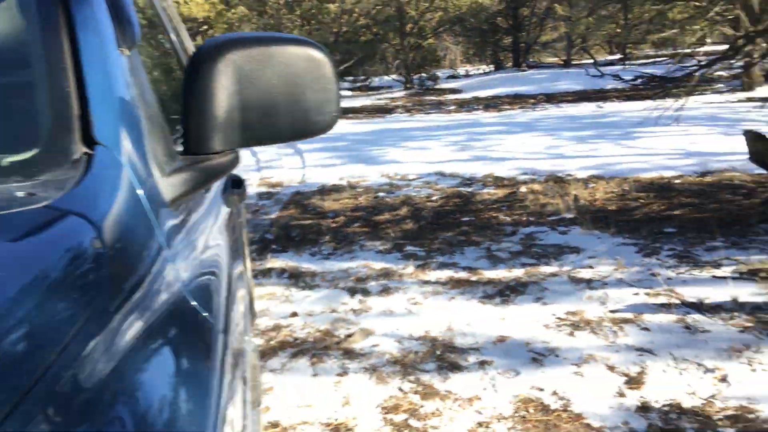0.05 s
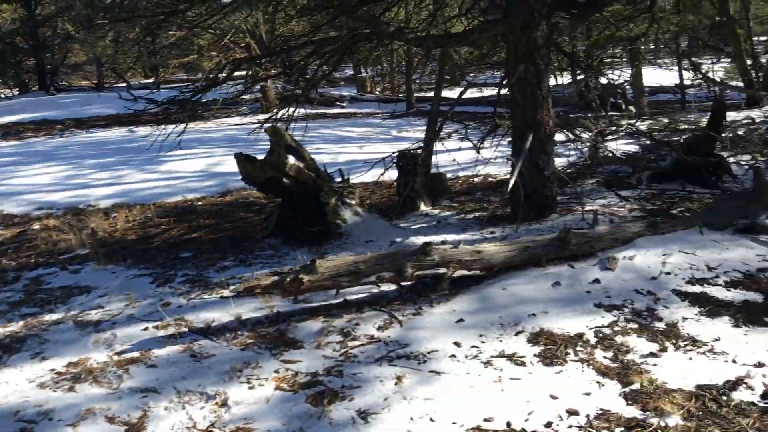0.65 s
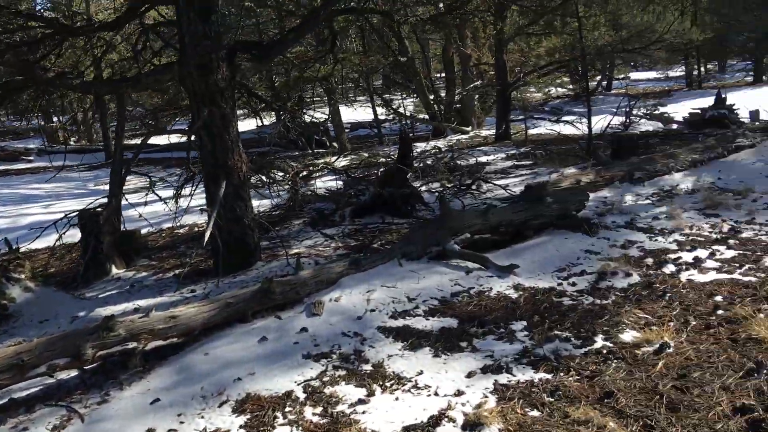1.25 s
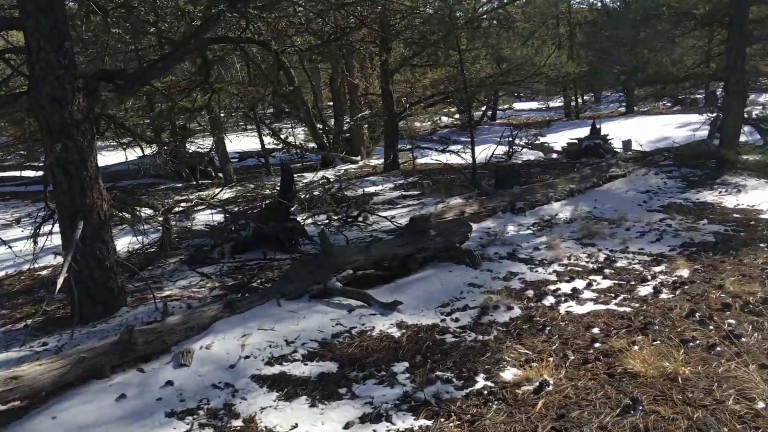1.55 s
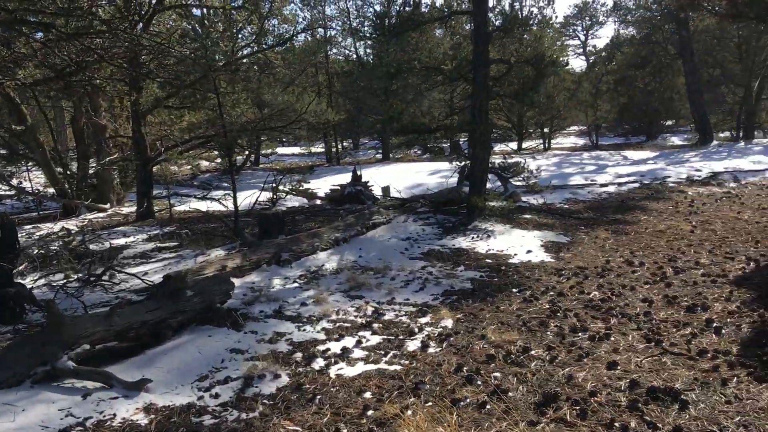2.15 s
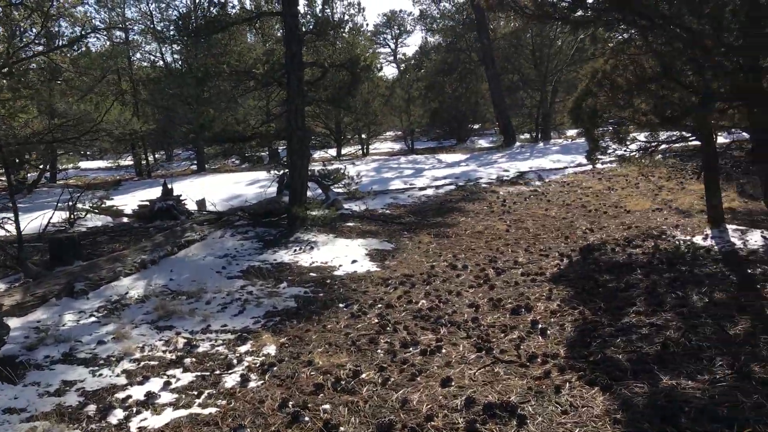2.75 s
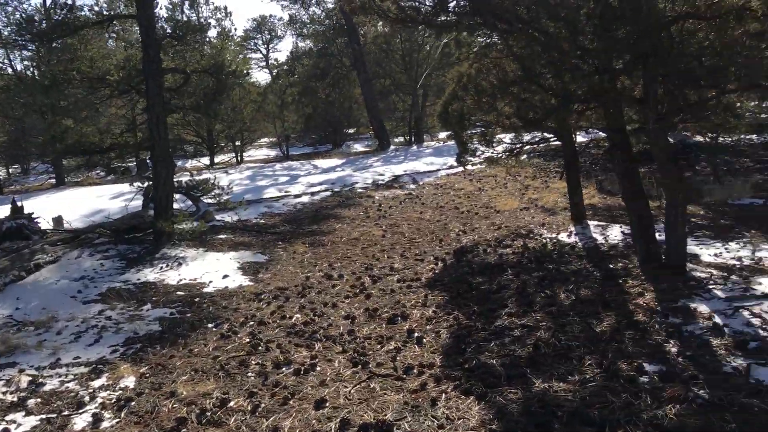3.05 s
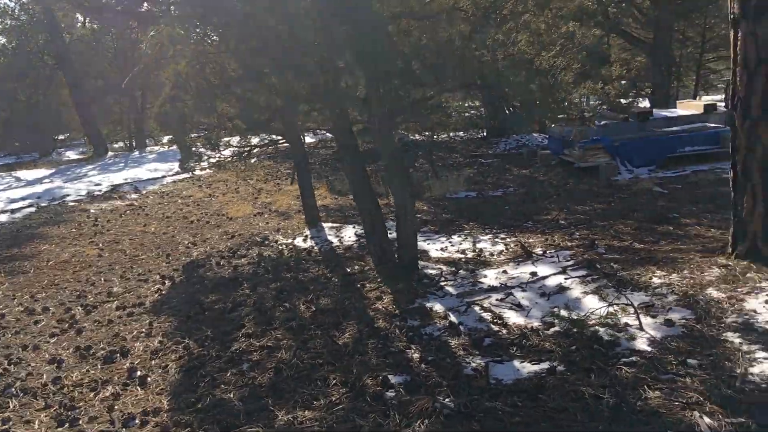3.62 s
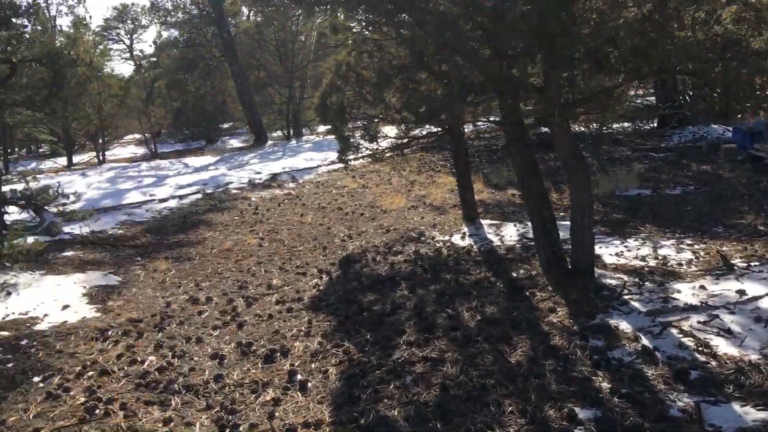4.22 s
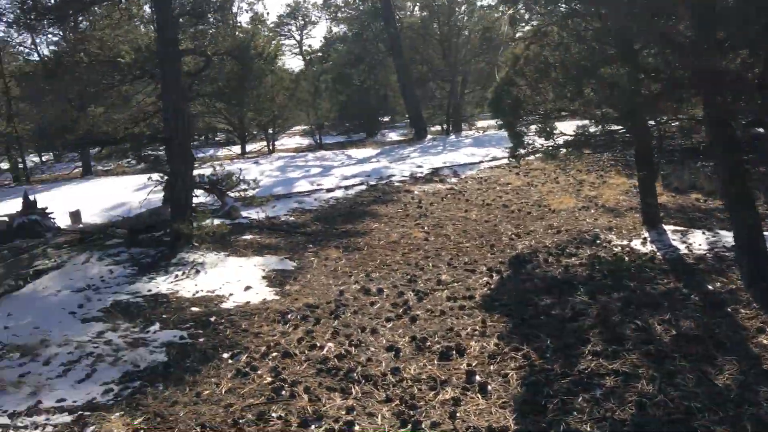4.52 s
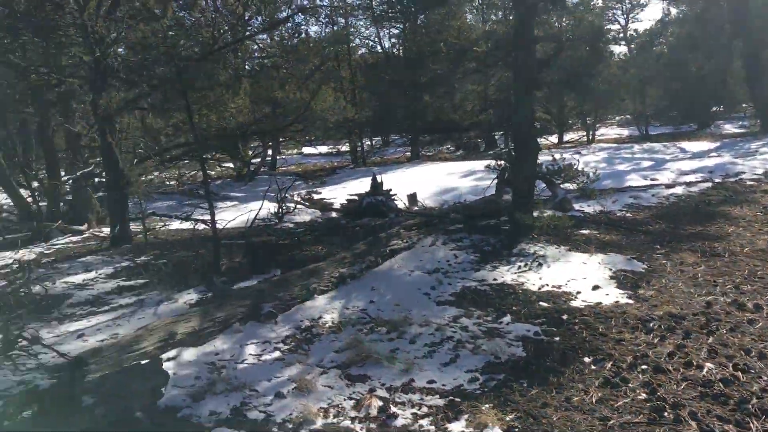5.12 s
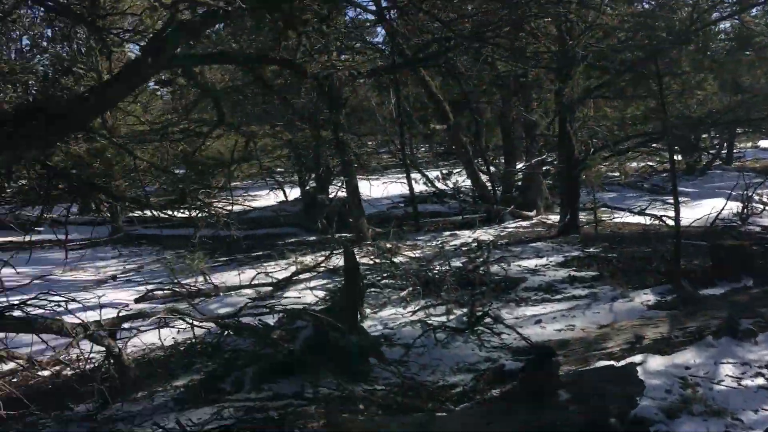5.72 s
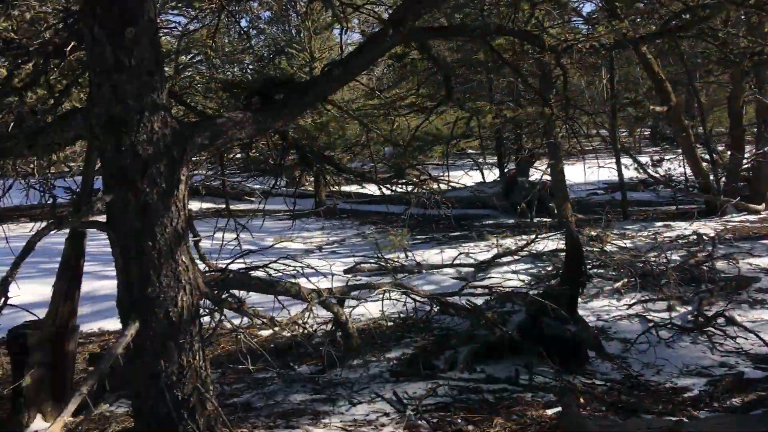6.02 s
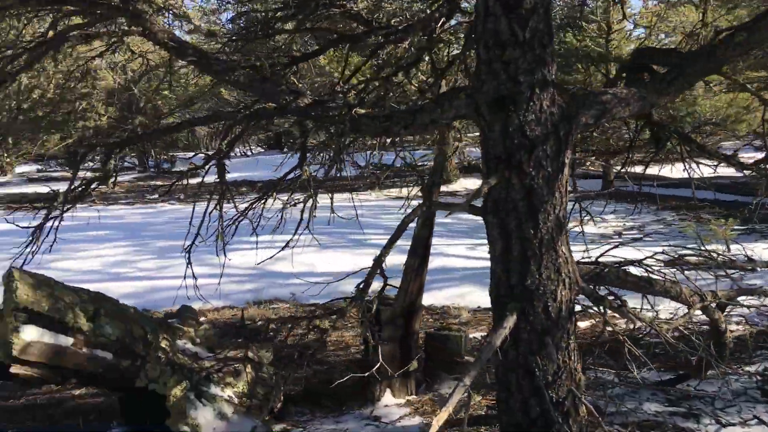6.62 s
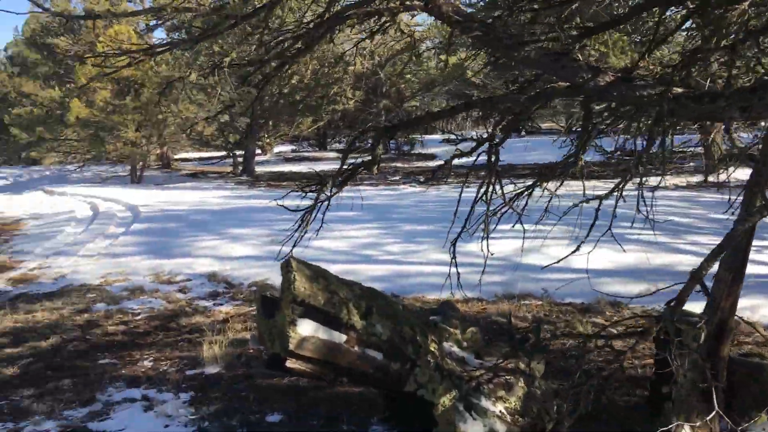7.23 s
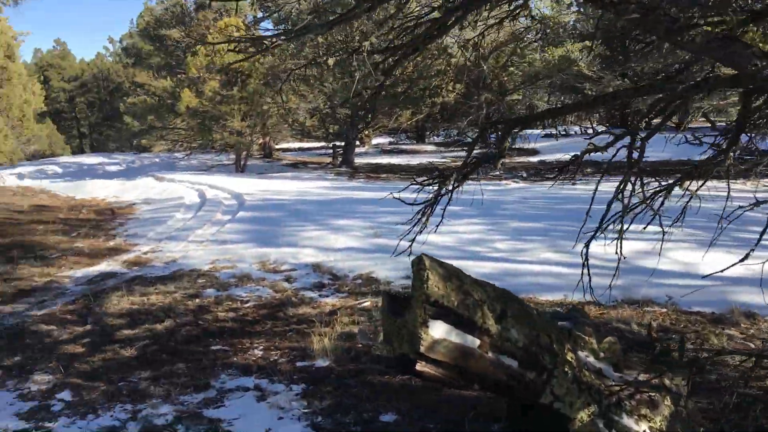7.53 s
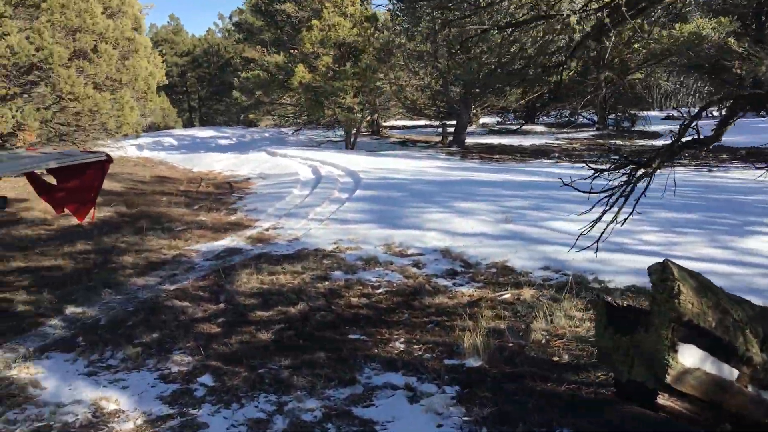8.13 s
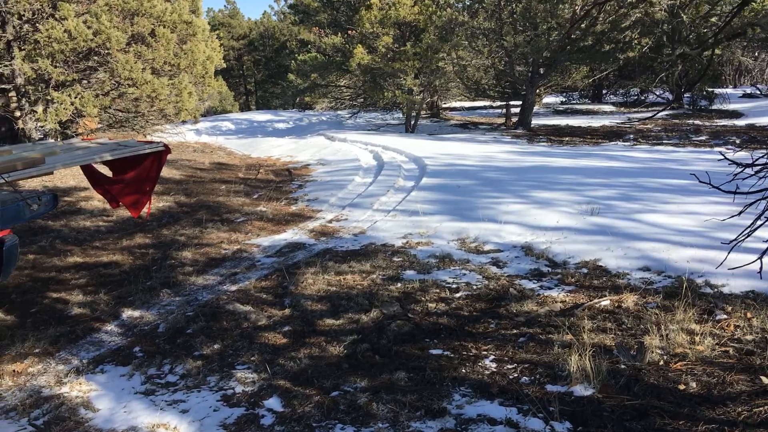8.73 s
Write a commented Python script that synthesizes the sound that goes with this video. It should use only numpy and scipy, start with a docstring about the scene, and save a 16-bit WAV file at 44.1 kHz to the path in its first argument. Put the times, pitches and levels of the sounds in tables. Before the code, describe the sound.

Feet shuffle on gravel, crusted snow and snapping twigs while wind buffets the microphone in a quiet pine wood.

```python
"""Feet shuffle and turn on the spot in a pine wood, close under a hand-held microphone.
The soles grind gravel, crush crusted snow and splinter needles; twigs crack, ring and thud.
Eddies of wind buffet the microphone, one hard puff whistles across its port, and fingers bump it
twice at the end. Far behind are a soft breeze in the treetops, a small bird and a faint hiss."""
import sys
import numpy as np
from scipy import signal
from scipy.fft import rfft, irfft, next_fast_len
from scipy.io import wavfile
from scipy.ndimage import uniform_filter1d

SR = 44100
rng = np.random.default_rng(int(sys.argv[2]) if len(sys.argv) > 2 else 0)


def unload_wav(signal):
    """Save mono or channel-first audio to the path in sys.argv[1] as 16-bit WAV at rate SR, clipped to [-1, 1]."""
    wavfile.write(
        sys.argv[1],
        SR,
        np.round(np.clip(np.atleast_2d(signal).T, -1, 1) * 32767).astype(np.int16),
    )


N = 391166
TIME = np.arange(N) / SR
CUTOFF_HZ = 16000   # top of the microphone's range
SHUFFLE_DB = -68.5   # gravel level of an ordinary shuffle

# rumble spectrum of wind on the microphone and of the ground underfoot: f/Hz, relative level/dB
RUMBLE = [(22, -16), (35, -3.5), (52, 2), (78, 0.5), (110, -7.5), (160, -16), (300, -53)]


def from_db(db):
    """Decibels to gain."""
    return 10 ** (np.asarray(db) / 20)


def rms_one(x):
    """Scale to unit power."""
    return x / np.sqrt(np.mean(x ** 2) + 1e-20)


def peak_one(x):
    """Scale to unit height."""
    return x / np.max(np.abs(x))


def gain_curve(rows):
    """Rows of t/s, level/dB as a gain per sample."""
    return from_db(np.interp(TIME, *np.transpose(rows)))


def add(out, s, sound):
    """Mix a short sound in at time s."""
    at = int(np.clip(s * SR, 0, N - 1))
    out[at:at + len(sound)] += sound[:N - at]


def cut(x, hz, kind, order):
    """Causal low- or high-pass."""
    return signal.sosfilt(signal.butter(order, hz, kind, fs=SR, output="sos"), x + 1e-18)


def resonance(x, hz, width_hz):
    """Two-pole resonance with gain 1 at its peak."""
    r = np.exp(-np.pi * width_hz / SR)
    feedback = [1, -2 * r * np.cos(2 * np.pi * hz / SR), r * r]
    return signal.lfilter(np.array([1, 0, -1]) * (1 - r * r) / 2, feedback, x + 1e-18)


def colour(x, spectrum):
    """Filter by a spectrum that falls 12 dB per octave beyond its ends; rms 1."""
    hz, db = np.transpose(spectrum)
    size = next_fast_len(N)
    log_hz = np.log(np.fft.rfftfreq(size, 1 / SR) + 1)
    outside = np.maximum(np.log(hz[0]) - log_hz, 0) + np.maximum(log_hz - np.log(hz[-1]), 0)
    gain = from_db(np.interp(log_hz, np.log(hz), db)) * np.exp(-2 * outside)
    return rms_one(irfft(rfft(x, size) * gain, size)[:N])


def noise(spectrum):
    """Coloured noise, rms 1."""
    return colour(rng.standard_normal(N), spectrum)


def even_noise(spectrum, window_s):
    """Coloured noise with its slow swells levelled and its fine texture kept."""
    x = noise(spectrum)
    return x / np.sqrt(uniform_filter1d(x ** 2, int(window_s * SR)) + 1e-6)


def wander(count, smooth):
    """A random curve averaged over `smooth` points; rms 1."""
    return rms_one(uniform_filter1d(rng.standard_normal(count), smooth))


def stroke(s, rise, hold, t60):
    """Pressure builds up to time s, holds and dies away."""
    out = np.zeros(N)
    span = slice(*np.searchsorted(TIME, [s - rise, s + hold + t60]))
    t = TIME[span] - s
    out[span] = np.clip(t / rise + 1, 0, 1) * np.exp(-np.log(1000) * np.maximum(t - hold, 0) / t60)
    return out


def ring(hz, t60):
    """One damped mode, height 1."""
    t = TIME[:SR // 10]
    return peak_one(np.sin(2 * np.pi * hz * t) * np.exp(-np.log(1000) * t / t60))


def woodland(x, t60, wet_db):
    """Ground and trunks scatter a faint, short tail."""
    t = TIME[:SR // 3]
    scatter = rng.standard_normal(len(t)) * np.exp(-np.log(1000) * t / t60) * (t > .003)
    return x + from_db(wet_db) * signal.fftconvolve(x, scatter / np.linalg.norm(scatter))[:N]


def hiss():
    """A faint, steady hiss lies behind everything."""
    # spectrum of the hiss: f/Hz, relative level/dB
    spectrum = [(1470, -35), (2500, -5.5), (4880, -8), (6200, -0.5), (7650, -6), (9580, 0), (10400, -2),
                (12200, 0), (15000, -1), (16000, -2.5)]
    return from_db(-73) * noise(spectrum)


def treetops():
    """A soft breeze sighs through the needles far overhead."""
    # strength of the breeze: t/s, level/dB
    breeze = [(0, -66), (3.2, -64), (4.8, -61.5), (7.0, -62.5), (8.87, -63.7)]
    # spectrum of air in the needles: f/Hz, relative level/dB
    needles = [(150, -10), (300, -4.5), (620, 1.5), (1000, -1.5), (1500, -7), (2200, -15.5), (3500, -21),
               (7000, -34)]
    return gain_curve(breeze) * noise(needles)


def bird():
    """A small bird far off: thin, wavering notes with a weaker octave, blurred among the trunks."""
    # notes: t/s, half-width/s, relative level/dB
    notes = [(2.252, .02, -72), (3.62, 0.038, -69), (4.196, .02, -74), (4.304, .022, -73),
             (4.362, 0.01, -70), (4.405, 0.012, -69), (6.48, .028, -71), (6.678, 0.0058, -65)]
    pitch_hz, waver_hz = 5290, 130
    out, t = np.zeros(N), TIME[:SR // 5] - 1 / 10
    for s, width, db in notes:
        phase = 2 * np.pi * np.cumsum(pitch_hz + waver_hz * wander(len(t), smooth=120)) / SR
        tone = np.sin(phase) + .5 * np.sin(2 * phase)
        add(out, s + t[0], from_db(db) * np.exp(-(t / width) ** 2) * tone)
    return from_db(-1.5) * woodland(out, t60=0.08, wet_db=-13)


def wind():
    """Turbulence rumbles and flutters on the microphone port; each eddy is a lump of pressure."""
    # rumble of the wind at the microphone: t/s, level/dB
    strength = [(0, -70.5), (.38, -56), (.52, -68), (.85, -65), (1.1, -55), (1.35, -73), (1.46, -51),
                (1.87, -49.5), (1.97, -54), (2.1, -48), (2.78, -49), (3.03, -55.5), (3.38, -46),
                (3.92, -52), (4.2, -44), (4.6, -63.5), (5.5, -63), (8.87, -62)]
    # single eddies hitting the port: t/s, peak level/dB, half-width/s
    eddies = [(1.07, -47.5, .004), (1.449, -37, 0.0017), (1.49, -38.5, 0.0028), (1.546, -29.5, 0.0038),
              (1.628, -32.5, 0.002), (1.76, -24, 0.0034), (1.827, -32, 0.0011), (1.881, -36, 0.0027),
              (2.081, -35.5, 0.003), (2.219, -39.5, .0022), (2.331, -39.5, .0027), (2.396, -33, 0.0055),
              (2.606, -33, 0.0015), (2.689, -35.5, 0.0017), (3.09, -27.5, 0.0016), (3.105, -19, 0.0026),
              (3.144, -23, 0.0042), (3.29, -35, 0.0065), (3.604, -29, 0.0033), (3.744, -40, 0.0025),
              (3.833, -42, .003), (4.081, -36, 0.0019), (4.194, -33, .004), (4.272, -33, 0.0028),
              (4.89, -42.5, 0.012), (5.148, -42.5, 0.0039), (5.301, -40.5, .0016), (5.564, -47, 0.0032)]
    # spectrum of the flutter: f/Hz, relative level/dB
    flutter_spectrum = [(100, -8.5), (150, 4), (195, 2.5), (250, -6), (315, -5.5), (420, -21.5), (800, -28)]
    swell_db, swell_s = -11, 0.022   # the rumble swells around each eddy
    swirl_db, swirl_s, eddy_s = -15.5, 0.018, 0.0014   # eddies narrower than eddy_s stir more flutter
    rumble_gain = gain_curve(strength)
    flutter_gain = np.hypot(from_db(-12.5) * rumble_gain, from_db(-63.5))   # some remains in a lull
    wobbles, swells, swirls = np.zeros((3, N))
    t = TIME[:SR // 3] - 1 / 8
    for s, db, width in eddies:
        lump = np.exp(-(t / width) ** 2)
        wobble = cut(lump, hz=65, kind="high", order=4)   # the bass cut makes the lump swing
        add(wobbles, s - np.argmax(wobble) / SR, from_db(db) * peak_one(wobble))
        add(swells, s + t[0], from_db(db + swell_db) * np.exp(-(t / swell_s) ** 2))
        add(swirls, s + t[0], from_db(db + swirl_db) * eddy_s / width / (1 + (t / swirl_s) ** 4))
    rumble = np.hypot(rumble_gain, swells) * even_noise(RUMBLE, window_s=.06)
    flutter = np.hypot(flutter_gain, swirls) * even_noise(flutter_spectrum, window_s=0.048)
    return wobbles + rumble + flutter


def puff():
    """One hard puff whistles on the port's edge, throbs in the hollow of the hand and leaves a rumble."""
    # spectrum of air rushing past the port: f/Hz, relative level/dB
    rush_spectrum = [(230, 6), (320, 9), (430, -2), (540, -10), (700, -3), (1150, 0), (1480, -9),
                     (2100, -8.5), (3200, -11.5), (5000, -17), (8000, -20), (15000, -26)]
    at_s, rise_s, hold_s = 3.085, 0.022, 0.0096
    front = stroke(at_s, rise_s, hold_s, t60=0.17)
    body = stroke(at_s, rise_s, hold_s, t60=0.51)
    wake = stroke(at_s + 0.045, rise_s, hold_s, t60=0.51)
    air = rng.standard_normal(N)
    whistle = from_db(-58) * rms_one(resonance(air, hz=1480, width_hz=67))
    hollow = resonance(air, hz=295, width_hz=100)
    throb = from_db(-38) * rms_one(cut(hollow, hz=490, kind="low", order=4))
    rumble = from_db(-28) * even_noise(RUMBLE, window_s=0.064)
    rush = from_db(-48.5) * noise(rush_spectrum)
    return front * (whistle + throb) + body * rush + wake * rumble


def bumps():
    """A soft fingertip gives the microphone a dull knock, then the housing rocks."""
    # fingers on the housing, ahead of the low-pass: t/s, knock/dB, hollow ring/dB, thud/dB
    touches = [(8.6214, -29.5, -50.5, -36.5), (8.8392, -36, -40, -37.5)]
    out = np.zeros(N)
    for s, knock_db, hollow_db, thud_db in touches:
        add(out, s, from_db(knock_db) * ring(hz=580, t60=0.0037))
        add(out, s, from_db(hollow_db) * ring(hz=1100, t60=0.015))
        add(out, s + 0.00322, -from_db(thud_db) * ring(hz=148, t60=0.043))
    return cut(out, hz=2300, kind="low", order=2)


def tear(split_s):
    """A sharp break smeared over the splitting time: each pitch leaves at its own moment."""
    size = 2048
    delay_s = split_s * (1 + np.tanh(wander(size // 2 + 1, smooth=40))) / 2
    return irfft(np.exp(-2j * np.pi * np.cumsum(delay_s) * SR / size), size)[:size // 2]


def snaps(breaks):
    """A break tears for a moment and sets the piece ringing; the bigger ones thud into the ground."""
    crack_s, ring_cycles = .0027, 8.2   # a crack's level is its rms over crack_s
    out = np.zeros(N)
    for s, crack_db, split_s, hz, ring_db in breaks:
        burst = tear(split_s)
        crack = cut(burst, hz=min(2.6 * hz, 7000), kind="high", order=1)   # small pieces radiate no bass
        add(out, s, from_db(crack_db) * crack * np.sqrt(SR * crack_s) / np.linalg.norm(crack))
        overtone_share = .85 * min(1, 1600 / hz)   # thin pieces hardly bend in their second mode
        for mode_hz, strength in [(hz, 1), (2.12 * hz, overtone_share)]:
            if mode_hz < CUTOFF_HZ:
                mode = ring(mode_hz, t60=ring_cycles / mode_hz + 0.00041)
                add(out, s, -from_db(ring_db) * strength * signal.fftconvolve(burst, mode))
        thud_db = crack_db - 6.5 - np.log2(hz / 1980)   # thinner pieces thud less, 1 dB per octave
        thud = ring(hz=164, t60=0.029) + .5 * ring(hz=418, t60=0.013)
        add(out, s + 0.00227, from_db(thud_db) * thud)
    return out


def twigs():
    """Twigs and crust break underfoot, and the wood around answers briefly."""
    # breaks: t/s, crack level/dB, splitting time/s, pitch of the piece/Hz, ring gain/dB
    breaks = [(0.5453, -52.5, 0.00068, 9240, -51), (0.641, -57, 0.0007, 2980, -54),
              (0.7097, -61, 0.0027, 900, -40.5), (0.779, -50, 0.0013, 2570, -43),
              (0.8153, -38.5, 0.0005, 2900, -30), (0.826, -42.5, 0.00085, 2830, -42),
              (1.0238, -36.5, .0022, 1980, -34.5), (2.274, -54.5, 0.0022, 5430, -51),
              (2.5971, -53, .0011, 3220, -37.5), (2.8154, -60, 0.00041, 1543, -48.5),
              (3.3135, -58, .002, 12500, -46), (3.541, -35.5, 0.00091, 2750, -28.5),
              (3.5482, -56, .00065, 9600, -33), (3.577, -57, .0009, 1600, -48),
              (4.0061, -64, 0.00066, 2700, -43.5), (4.5044, -49, .0014, 3000, -40),
              (4.757, -51, .00073, 11000, -40), (4.7915, -52, .0023, 12000, -42),
              (4.818, -23, 0.0016, 1590, -22), (5.2883, -47.5, 0.0013, 7860, -43),
              (5.3783, -62, 0.0011, 10100, -37.5), (5.612, -63, .0005, 14200, -29.5),
              (6.126, -65, .00054, 14500, -47), (6.21, -63, .001, 2930, -44.5),
              (6.312, -65, 0.0005, 13600, -24), (6.3432, -49, .0021, 9000, -48),
              (6.7935, -52, .003, 6000, -48), (6.8126, -46, 0.0028, 2450, -34),
              (6.9377, -49.5, 0.0011, 3150, -41), (6.98, -45, .0037, 3220, -54),
              (7.005, -53, 0.00059, 14000, -35), (7.01, -50, .0014, 5430, -43),
              (7.11, -54, 0.001, 3300, -46.5), (7.3753, -63, 0.0012, 4440, -48.5),
              (7.81, -60, .003, 3160, -50)]
    return woodland(snaps(breaks), t60=0.14, wet_db=-15.5)


def splinters(pressure):
    """Needles and tiny twigs break at random under the sole, more often and louder as it presses."""
    per_s, level_db, spread_db = 10, -60, 2   # under an ordinary shuffle
    low_hz, high_hz, split_s, ring_over_crack_db = 2380, 13100, 0.0022, 7
    candidates = 500
    when, chance, thinness, strength = rng.random((candidates, 4)).T
    load = (pressure[(when * N).astype(int)] / from_db(SHUFFLE_DB)) ** .45
    db = level_db + 20 * np.log10(load + 1e-9) + spread_db * (2 * strength - 1)
    hz = low_hz * (high_hz / low_hz) ** thinness
    breaks = np.column_stack([when * N / SR, db, np.full(candidates, split_s), hz, db + ring_over_crack_db])
    return snaps(breaks[chance < per_s * load * N / SR / candidates])


def grains(per_s, spread_db):
    """Tiny random fractures: many weak, a few strong; the same power at any rate."""
    sizes = from_db(spread_db * np.minimum(rng.exponential(1, N), 3)) / np.sqrt(per_s)
    return (rng.random(N) < per_s / SR) * sizes * rng.choice([-1, 1], N)


def pebbles(clicks, sizes):
    """Every grain rings briefly at a pitch set by its size."""
    size = rng.integers(0, sizes, N)
    pitches_hz = np.geomspace(1500, 15000, sizes)
    return sum(resonance(clicks * (size == k), hz, width_hz=hz / 20) for k, hz in enumerate(pitches_hz))


def crunch(pressure, spectrum, per_s, ring_db):
    """Grains give way in clumps, more under more pressure: a light touch crackles, a full step fizzes."""
    rate = per_s * (pressure / from_db(-60.5) + 0.08) ** 0.69
    cracks = colour(grains(rate, spread_db=0.5), spectrum)
    rings = from_db(ring_db) * colour(pebbles(grains(rate, spread_db=8), sizes=16), spectrum)
    fine = colour(grains(per_s=9000, spread_db=2), spectrum)
    clumps = rms_one(from_db(2.27 * wander(N, smooth=180)))
    return pressure * clumps * rms_one(cracks + rings + fine)


def foot_pressure():
    """How hard the feet work the gravel, the crust and the ground; overlapping contacts add in power."""
    # full steps: t/s, rise/s, time on the ground/s, gravel level/dB, crust over gravel/dB,
    # crust lag/s, weight level/dB, weight lag/s
    steps = [(0.68, 0.095, 0.082, -61, 4, 0.04, -54, 0.039), (4.5, 0.015, 0.27, -54.5, 3, 0.058, -43, .006),
             (6.806, 0.021, 0.18, -47, -1.5, .005, -46, .045)]
    # light shuffles: t/s, rise/s, length/s, gravel level/dB, crust over gravel/dB
    scuffs = [(0.0, .01, 0.038, -74, 6.5), (.358, .04, .02, -76, 6), (0.554, .045, 0.042, -75, 3),
              (0.938, 0.035, 0.031, -72, 8), (1.016, .02, .045, -70, 5.5), (1.17, 0.1, 0.26, -73, 4),
              (2.111, 0.074, .13, -72.5, 1), (2.591, .03, 0.021, -66, 4), (2.848, .015, .045, -70.5, 5),
              (3.313, .007, 0.043, -65, 6.5), (3.538, .015, 0.022, -69, 16),
              (3.596, 0.0099, 0.038, -66.5, 8), (4.009, .006, 0.07, -64.5, -2.5),
              (4.188, .015, .025, -74.5, 13), (4.293, .045, 0.068, -80, 13.5),
              (4.985, 0.016, 0.0055, -62.5, -2.5), (5.06, .005, 0.01, -75, 13.5),
              (5.122, 0.0067, 0.0072, -67.5, 6), (5.28, 0.09, 0.024, -65, -2),
              (5.454, 0.19, 0.17, -70, 1.5), (6.26, 0.12, .09, -72.5, -0.5), (6.448, .018, 0.017, -74, 4),
              (7.104, .017, 0.061, -67, 0.5), (7.71, .045, 0.097, -74.5, .5), (7.988, .01, 0.01, -73, 12.5),
              (8.078, .015, 0.019, -68, 6), (8.437, 0.019, 0.076, -69, -14)]
    roll = from_db(-9.5)   # the heel bites, then the foot rolls on more lightly
    scuff_weight_db = -12   # against the shuffle's gravel level
    power = np.zeros((3, N))
    for s, rise, length, db, crust_db, crust_lag, weight_db, weight_lag in steps:
        down = stroke(s, rise, length, t60=0.37)   # the crunch dies as the foot lifts
        bites = [stroke(s + lag, rise + lag, hold=0.038, t60=0.61) for lag in (0, crust_lag)]
        gravel, crust = np.maximum(bites, roll) * down
        weight = stroke(s + weight_lag, rise=.012 + weight_lag, hold=0.016, t60=0.26)
        power += (from_db([db, db + crust_db, weight_db])[:, None] * [gravel, crust, weight]) ** 2
    for s, rise, length, db, crust_db in scuffs:
        press = stroke(s, rise, length, t60=0.055 + 5.3 * length)   # a longer shuffle dies more slowly
        power += (from_db([db, db + crust_db, db + scuff_weight_db])[:, None] * press) ** 2
    return np.sqrt(power)


def footsteps(gravel, crust, weight):
    """Each contact grinds gravel, crushes snow crust, rubs the sole and makes the ground boom."""
    # spectrum of grinding gravel: f/Hz, relative level/dB
    gravel_spectrum = [(1300, -0.5), (2200, -2.5), (3100, 1.5), (4200, -1.5), (5600, 0), (7500, -3.5),
                       (11000, -6.5)]
    # spectrum of breaking snow crust: f/Hz, relative level/dB
    crust_spectrum = [(4000, -33), (6000, -2), (9000, 1.5), (10400, 3), (12000, 4.5), (15500, 6),
                      (16500, -18)]
    # spectrum of the heel's thump: f/Hz, relative level/dB
    heel_spectrum = [(50, -4), (110, -1.5), (200, 6), (320, 0), (430, -4), (800, -44)]
    # spectrum of the rubbing sole: f/Hz, relative level/dB
    sole_spectrum = [(200, -21), (450, -1), (1000, 0.5), (1600, -20), (2400, -7.5), (4000, -33)]
    grit = crunch(gravel, gravel_spectrum, per_s=330, ring_db=-3.5)
    snow = crunch(crust, crust_spectrum, per_s=460, ring_db=-9)
    thump = even_noise(heel_spectrum, window_s=0.027)
    boom = from_db(-4) * noise(RUMBLE)
    friction = from_db(-68) * (gravel / from_db(SHUFFLE_DB)) ** 0.59   # grows more slowly than the crunch
    rub = friction * colour(grains(per_s=1900, spread_db=0), sole_spectrum)
    return grit + snow + rub + weight * (thump + boom)


def scene():
    """Feet, hand and wind close to one microphone; the treetops and the bird far off."""
    gravel, crust, weight = foot_pressure()
    background = treetops() + bird() + hiss()
    close = footsteps(gravel, crust, weight) + bumps() + wind() + puff() + twigs() + splinters(gravel)
    return (background + close)[None]


def record(dry):
    """The microphone port has a notch in the treble; the deep bass and the top are cut."""
    notched = dry - 0.58 * resonance(dry, hz=10380, width_hz=420)
    voiced = cut(notched, hz=32.7, kind="high", order=4)
    return signal.sosfilt(signal.ellip(10, .1, 80, CUTOFF_HZ, fs=SR, output="sos"), voiced)


dry = scene()
out = record(dry)
unload_wav(out)
```